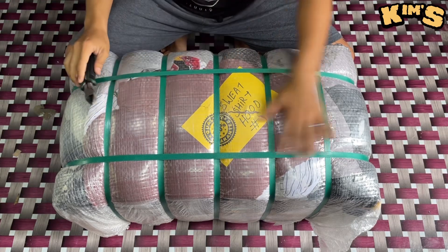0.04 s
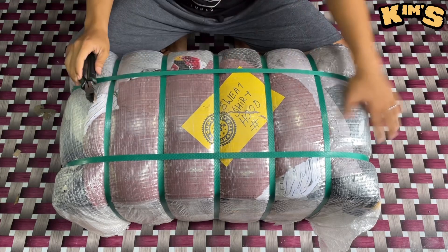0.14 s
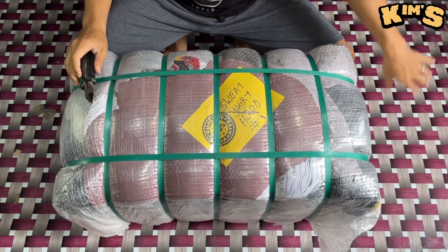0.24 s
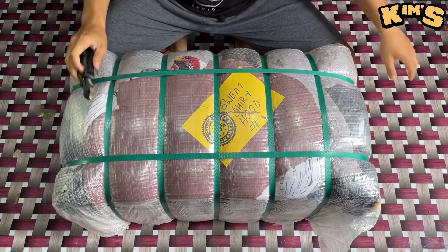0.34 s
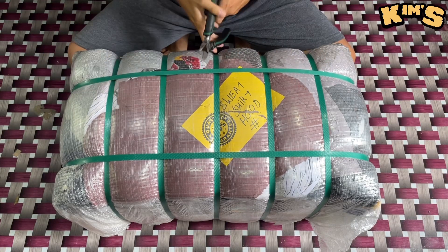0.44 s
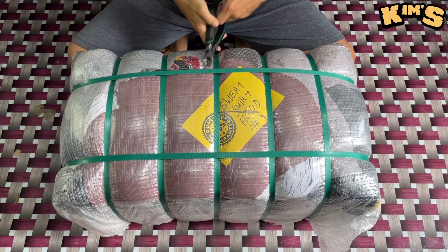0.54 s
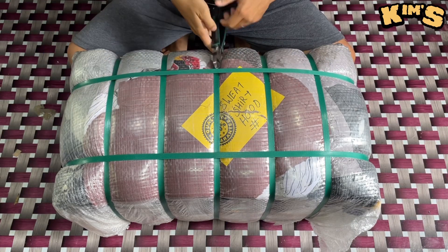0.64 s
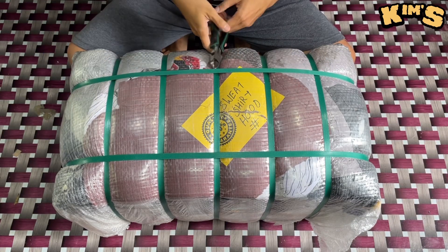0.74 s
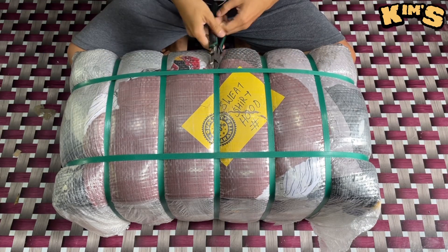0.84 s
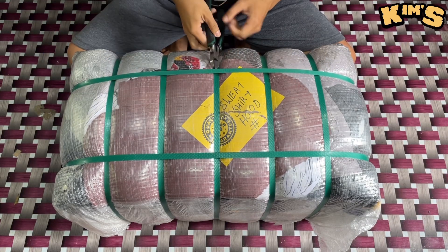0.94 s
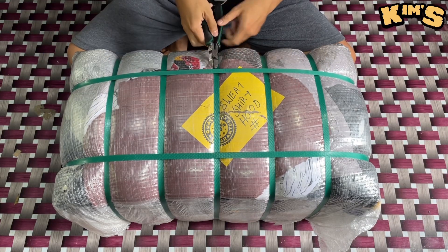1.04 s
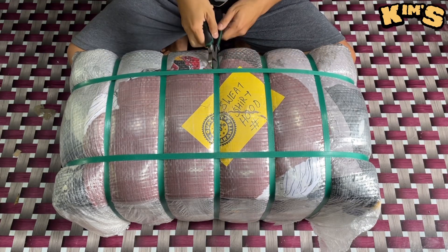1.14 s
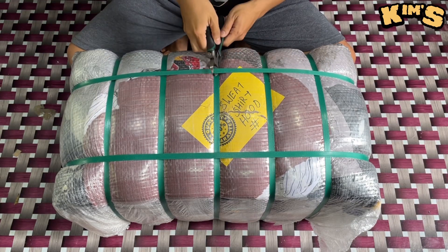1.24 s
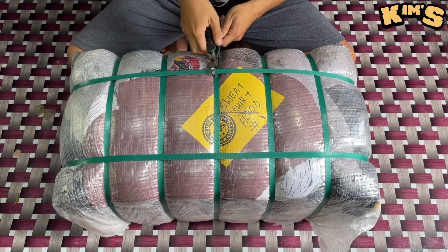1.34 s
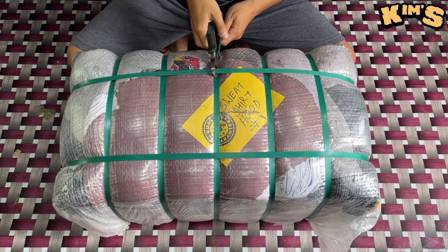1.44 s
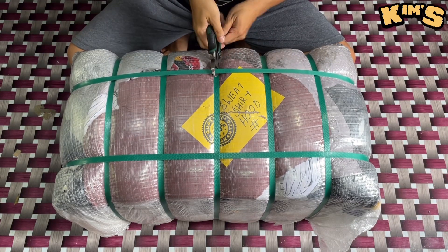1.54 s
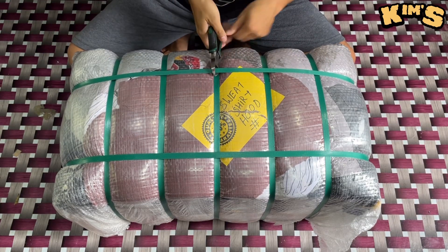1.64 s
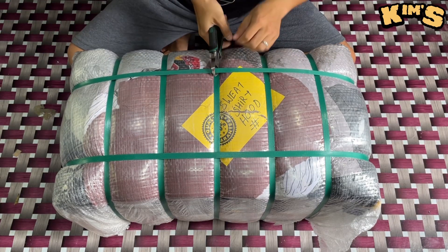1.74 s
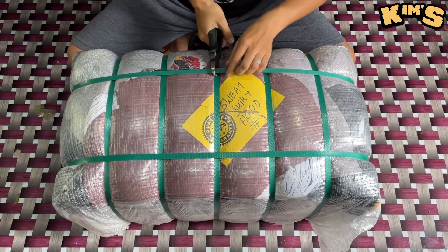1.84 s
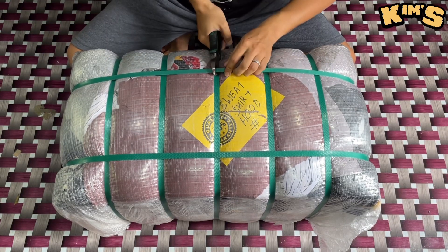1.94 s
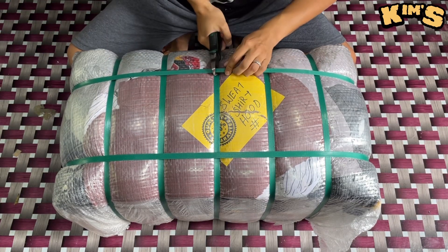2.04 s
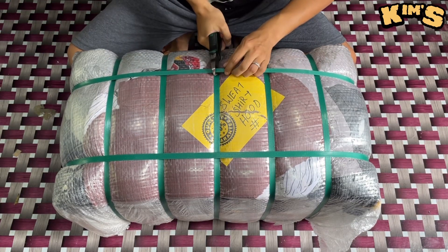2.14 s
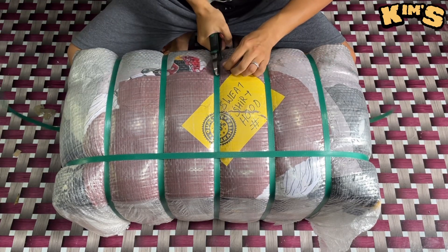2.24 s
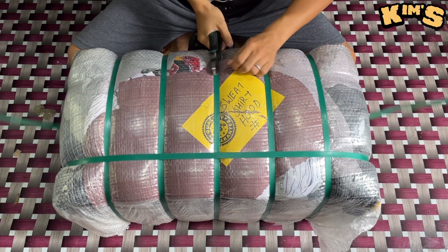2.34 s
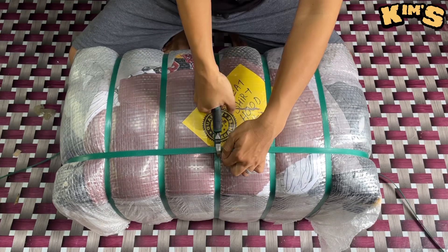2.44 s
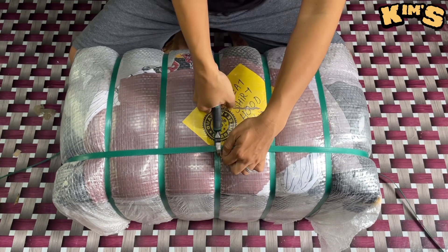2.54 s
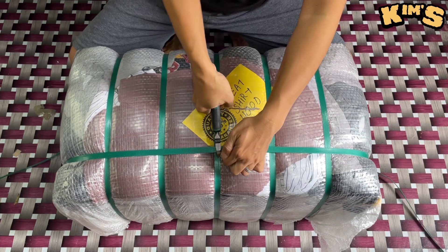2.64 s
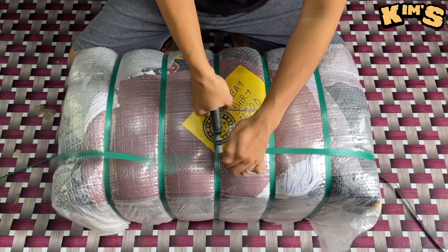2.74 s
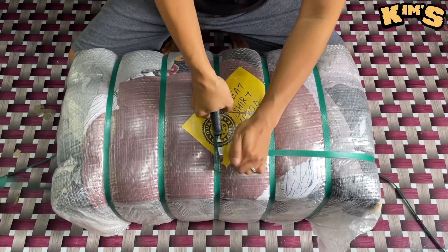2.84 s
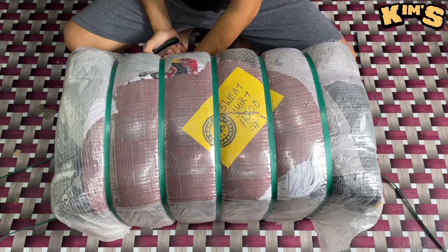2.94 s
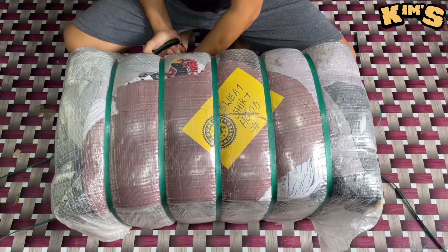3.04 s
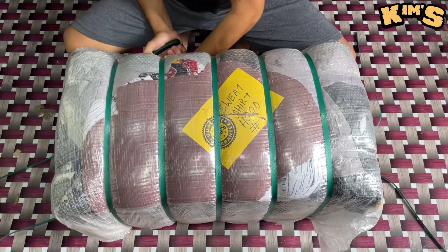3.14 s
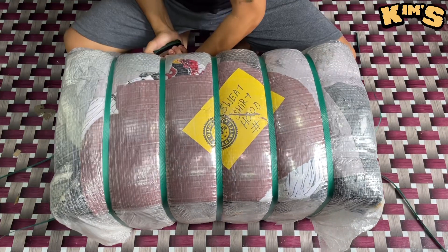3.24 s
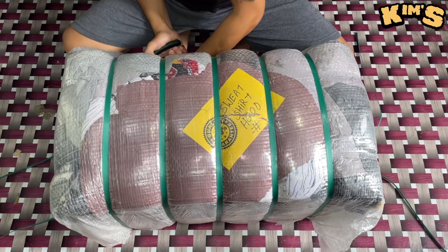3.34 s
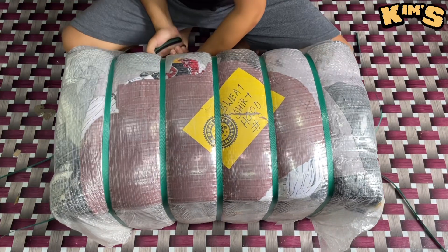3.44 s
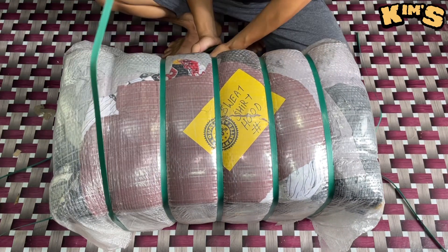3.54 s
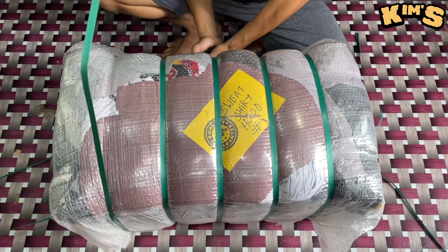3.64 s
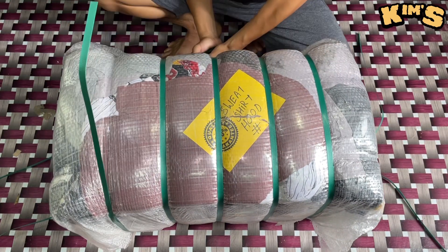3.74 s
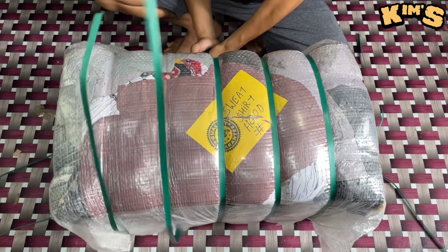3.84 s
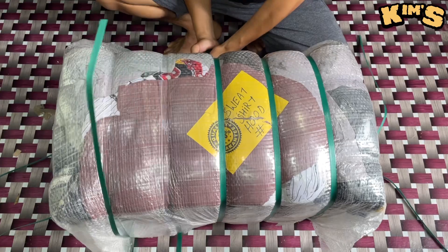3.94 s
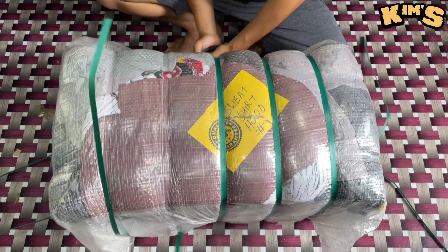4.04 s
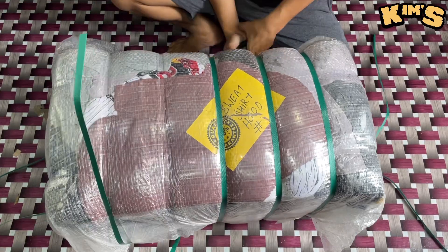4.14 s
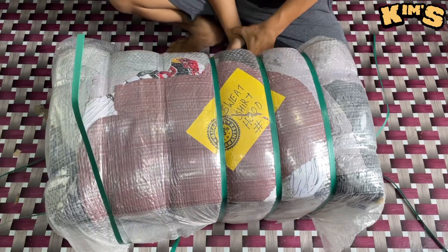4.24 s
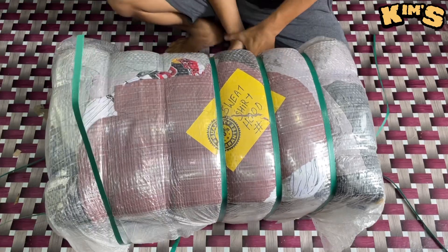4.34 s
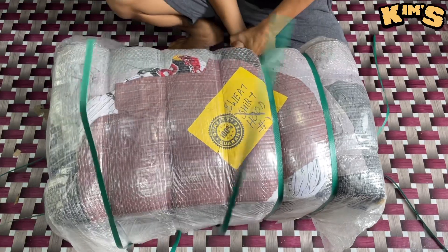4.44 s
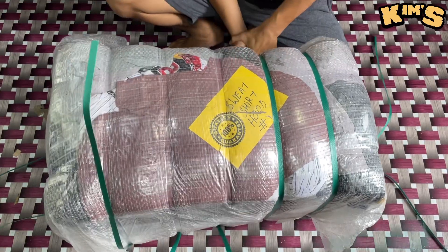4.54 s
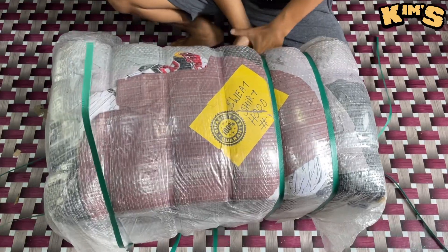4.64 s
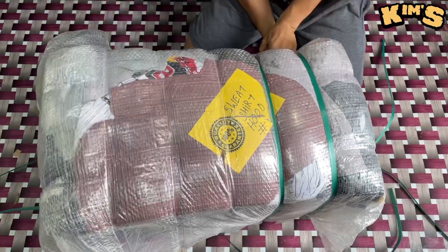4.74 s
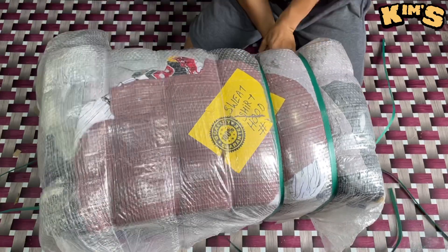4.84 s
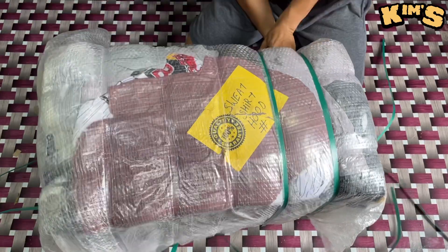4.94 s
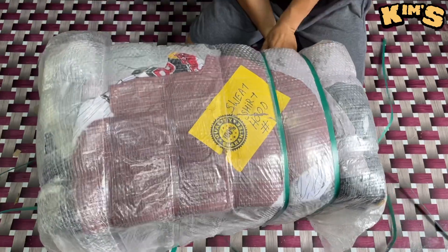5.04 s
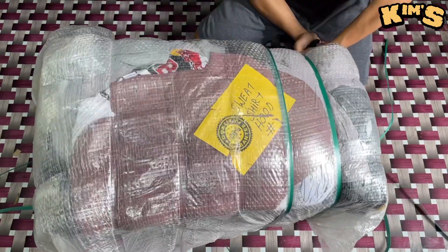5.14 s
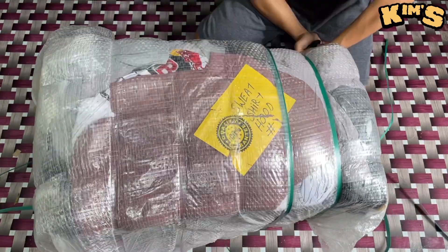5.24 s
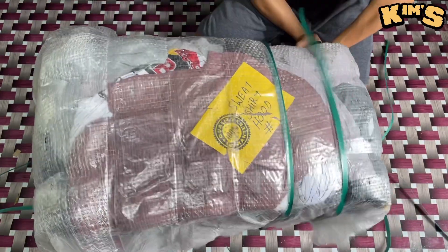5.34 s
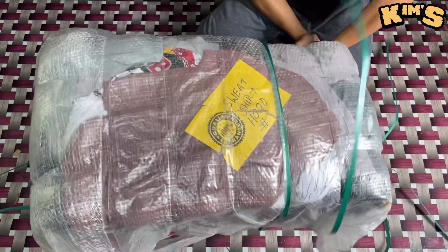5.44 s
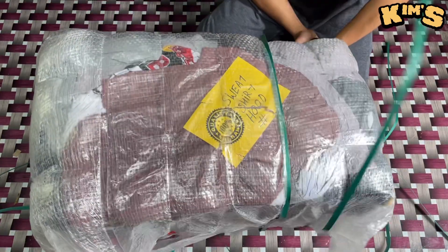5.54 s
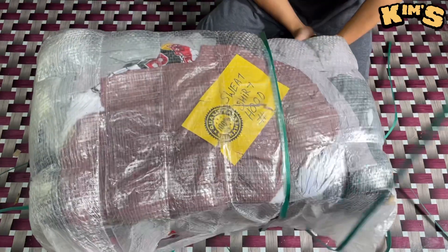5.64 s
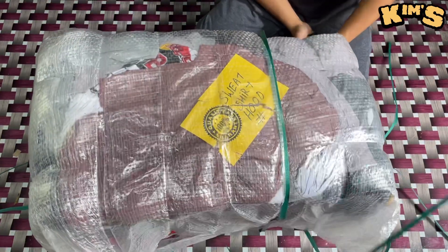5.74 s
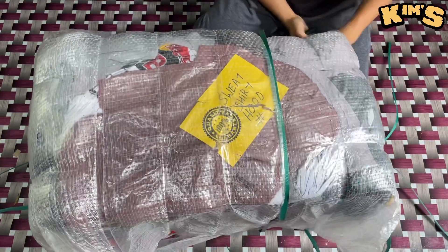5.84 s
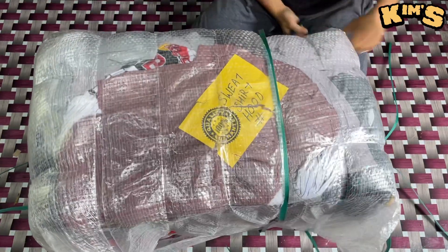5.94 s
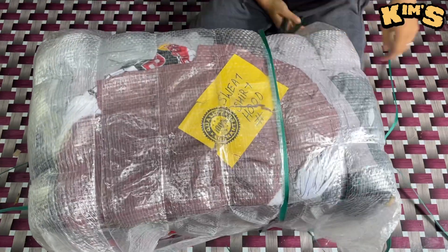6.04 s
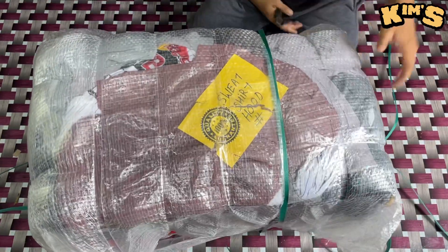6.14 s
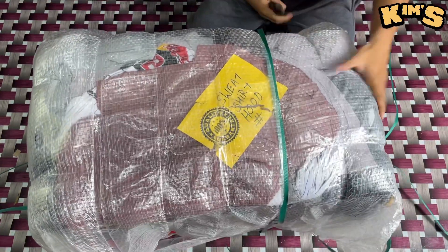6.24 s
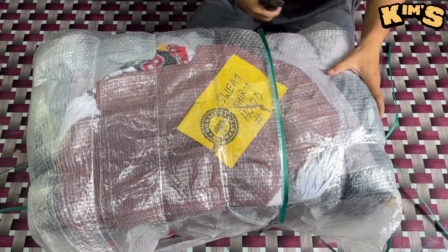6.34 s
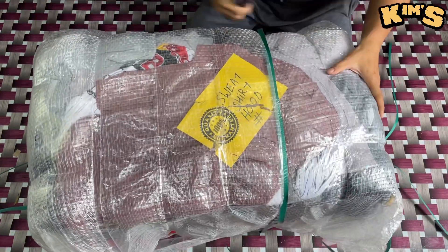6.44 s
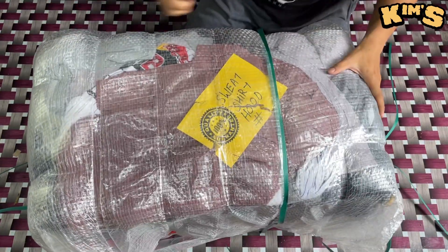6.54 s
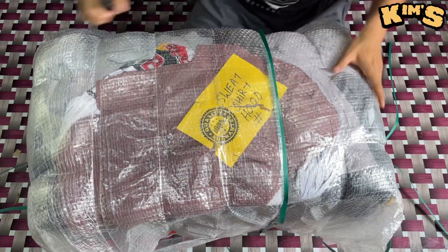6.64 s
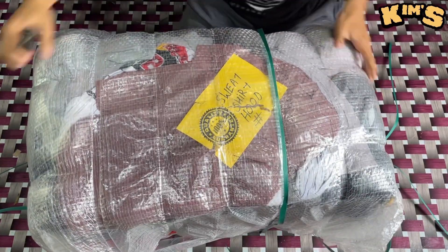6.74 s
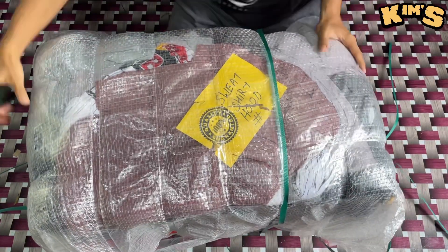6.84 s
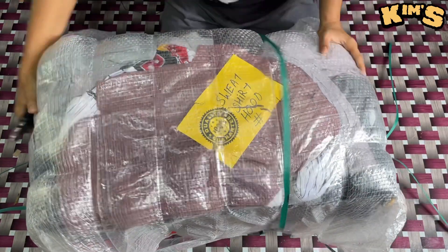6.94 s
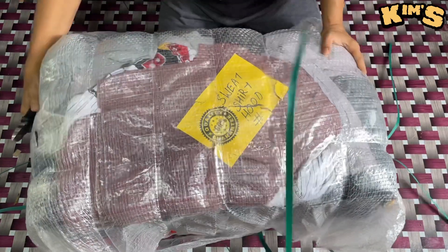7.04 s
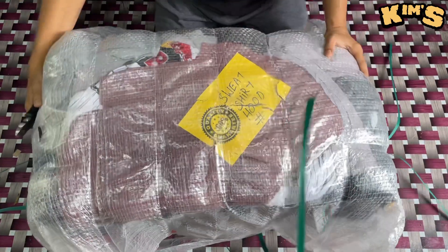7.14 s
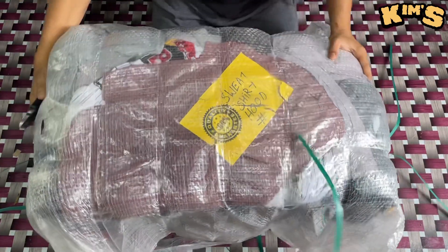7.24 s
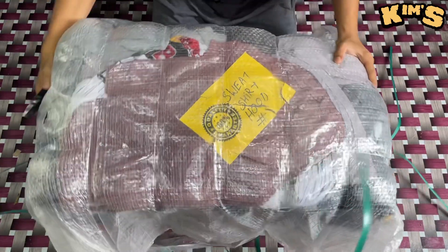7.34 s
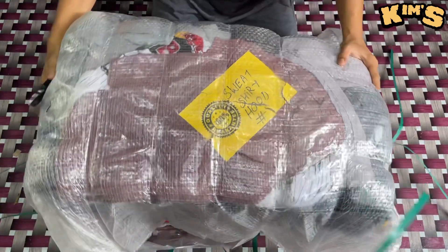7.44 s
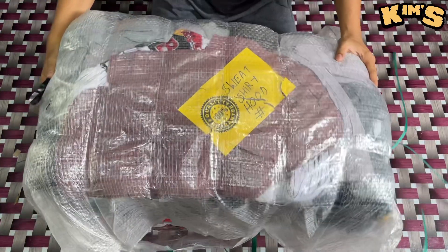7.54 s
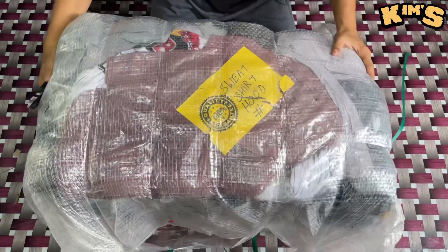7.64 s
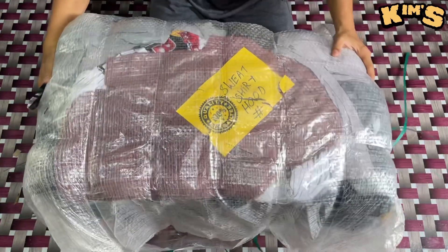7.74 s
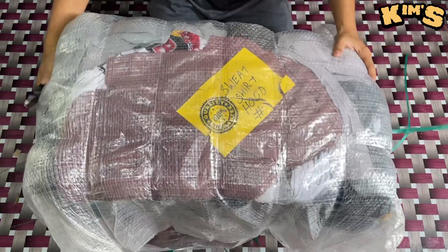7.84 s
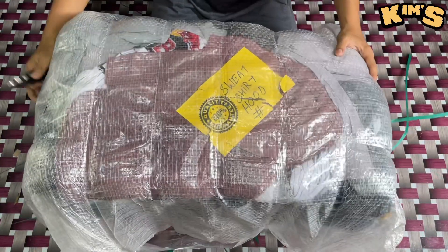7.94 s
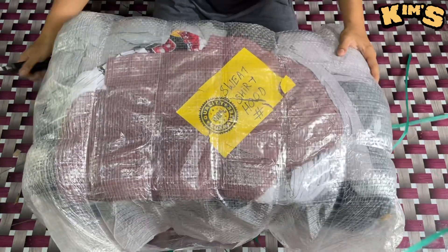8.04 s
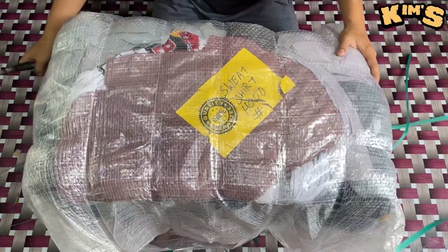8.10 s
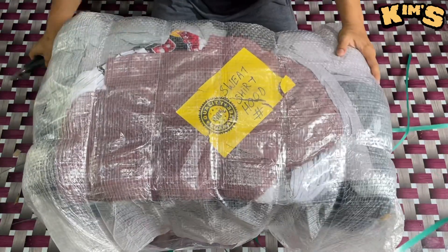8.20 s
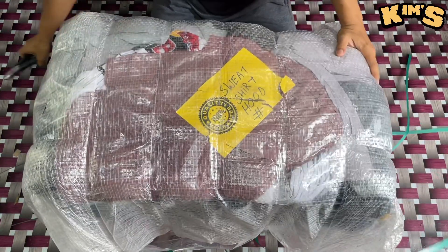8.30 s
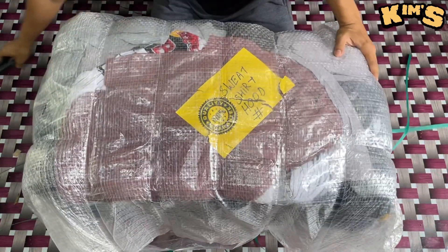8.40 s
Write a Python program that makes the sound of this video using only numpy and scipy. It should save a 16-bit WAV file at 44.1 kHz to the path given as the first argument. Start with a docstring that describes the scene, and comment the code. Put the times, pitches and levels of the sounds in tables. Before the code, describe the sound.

Seven loud, sharp snaps of tight plastic straps being cut, each with a short boom and room tail, then crinkling plastic wrap in a quiet room.

```python
"""Seven tight plastic straps round a wrapped bale are cut with pliers, close under a small microphone.
Each cut is a noise crack, a falling sine thump, a resonant boom of the bale and a decaying room tail.
Loose ends slap, low pressure bumps hit the microphone, taut straps ring, creases tick, straps drag.
The wrap crinkles as noise puffs in spells over a quiet room; the loudest cracks overload the microphone."""
import sys
import numpy as np
from scipy import signal
from scipy.fft import rfft, irfft
from scipy.io import wavfile
from scipy.ndimage import uniform_filter1d

SR = 44100
rng = np.random.default_rng(int(sys.argv[2]) if len(sys.argv) > 2 else 0)


def dump_mix(stems):
    """Bounce the given channels to the path in sys.argv[1] as a 16-bit WAV at rate SR."""
    frames = np.atleast_2d(stems).T  # one column per channel
    limited = np.clip(frames, -1, 1)  # hard clip at full scale
    pcm = np.round(limited * 32767).astype(np.int16)
    wavfile.write(sys.argv[1], SR, pcm)


def gain_from_decibels(decibels):
    """Convert decibel values to linear amplitude factors."""
    exponent = np.asarray(decibels, float) / 20
    return 10 ** exponent


N = 373527

# strap cuts: start_s, crack_db, bright_hz, thump_db, room_db
CUTS = [(2.1731, 4.5, 3937, 2.5, -20.5), (2.7539, 2, 9640, -5, -19.5), (3.16, 3.5, 6370, 3.5, -19),
        (3.7943, 0.5, 5640, 3, -15.5), (4.358, 3, 9110, 5, -15), (4.9018, -1.5, 6400, 0, -16),
        (5.318, 7.5, 3350, 1.5, -21)]
# slaps of loose strap ends: start_s, level_db, length_ms
END_SLAPS = [(2.1775, -21.5, 2.2), (3.164, -19.5, 2), (3.7965, -18, .6), (3.798, -7, 1.8),
             (3.8118, -18, 2.7), (3.816, -19.5, 1.8), (4.3595, -8, 1.2), (4.362, -16.5, 3),
             (4.9062, -16.5, 1.4), (4.919, -9.5, 0.9), (5.3235, -21, 0.63)]
# low pressure bumps and air puffs at the microphone: start_s, signed_scale, time_constant_ms
PRESSURE_BUMPS = [(.4, .004, 2), (2.755, 0.038, 5.5), (3.16, 0.041, 11.5), (3.80, -0.13, 10),
                  (4.362, -0.24, 30), (4.903, 0.15, 12.4), (5.323, 0.23, 9), (5.33, 0.16, 24.5),
                  (5.97, 0.14, 43), (6.059, -0.21, 38.8), (6.78, 0.011, 31)]
# crack and slap spectrum: freq_hz, level_db
CRACK_SPECTRUM = [(590, -17.5), (1000, 6), (2470, -5), (3810, -1), (8860, -6.5), (10200, -2.5), (12300, -2),
                  (15400, -20), (16500, -36.5)]
# bale resonances before the tilt: freq_hz, width_hz, level_db
BALE_MODES = [(210, 74, 6), (243, 64, 3.5), (310, 50, -4.5), (481, 25, 1), (570, 48, -0.5), (796, 89, -2.5),
              (937, 39, -7.5)]
# room tail spectrum: freq_hz, level_db
ECHO_SPECTRUM = [(35, -32.5), (60, -12.5), (81, -27.5), (199, -9), (393, -2.5), (854, -5), (1240, -13.5),
                 (2140, -18.5), (11900, -25.5), (15400, -28.5), (16500, -62.5)]
# room decay: freq_hz, t60_s
ROOM_DECAY = [(120, 0.46), (320, 0.23), (840, 0.23), (2210, .22), (5820, 0.19), (12000, 0.26)]
# hand or pliers rubbing a taut strap: start_s, drive_db, rub_ms
STRAP_RUBS = [(0.013, -49.5, 7.9), (0.041, -45, 10), (0.106, -51.5, 13), (.612, -48, 13.6),
              (0.672, -56, 13), (.735, -35, 67), (1.149, -45.5, 35), (1.239, -54, 5.2),
              (1.394, -55.5, 11.4), (2.53, -59, 24), (3.532, -50, 9.3)]
# taut strap modes: freq_hz, level_db, t60_s
STRAP_MODES = [(151, -26.5, .1), (231.8, -1, 0.167), (295, 5, 0.045), (378, -10.5, 0.094),
               (487, -3.5, 0.021), (584, -16.5, 0.098), (654, -26, 0.16), (890, -8.5, 0.086),
               (1210, -14, 0.13)]
# plastic creases and plier clicks: start_s, ring_peak_db, ring_hz, treble_re_ring_db
CREASE_TICKS = [(0.591, -27, 5200, -12), (0.597, -40, 2500, -8), (0.6147, -36, 2400, -12),
                (0.6731, -32, 6400, -17), (0.683, -37, 6500, -14), (0.8411, -45, 1100, -12),
                (1.2394, -41, 1230, -7), (1.4047, -55, 3030, 14), (1.7294, -42.5, 1030, -8.5),
                (1.855, -37.5, 915, -8), (2.0224, -23.5, 2000, 3.5), (2.049, -31.5, 1470, -17),
                (2.106, -44.5, 1550, -9), (2.382, -47, 2340, 5), (2.4019, -32.5, 1040, -20),
                (2.561, -38, 4000, -2), (2.592, -48, 3500, 1), (2.69, -42.5, 1450, -8),
                (2.7045, -42.5, 1800, -4), (3.0725, -35, 1070, -22), (3.4076, -24, 856, -30),
                (4.537, -31.5, 3280, 1.5), (4.5702, -20.5, 870, 2.5), (4.691, -42, 1030, 6),
                (4.7278, -37, 2490, 6), (4.773, -37, 2580, 4), (4.8624, -35, 2470, 1),
                (5.1814, -35.5, 1640, 11.5), (5.2082, -35, 1850, -13), (5.281, -33.5, 2180, 7.5),
                (5.535, -32, 1720, 4.5), (5.5878, -29, 2330, 1), (5.611, -37, 2450, 16),
                (5.7098, -28, 920, -17), (5.726, -38, 1680, 4), (6.148, -30, 1720, -1),
                (6.1808, -29, 755, 4), (6.2906, -29.5, 450, -12), (6.383, -28, 950, 1.5),
                (6.4239, -32.5, 1530, 2), (6.46, -49.5, 2800, 24), (6.5024, -23.5, 2680, -12),
                (6.5284, -31.5, 1120, 2), (6.855, -31, 500, -10), (6.908, -33, 2060, 8.5),
                (7.177, -33, 520, -12), (7.2674, -24, 2740, -0.5), (7.4172, -30, 2240, -2),
                (7.4869, -30, 1110, -7), (7.7532, -51, 1520, 12.5), (7.9339, -42, 2770, 7),
                (8.046, -48, 2890, 7), (8.255, -50.5, 2580, 18)]
# loose strap dragged over the woven wrap: start_s, length_s, ring_db, hiss_db
STRAP_DRAGS = [(5.9, 0.091, -34.5, -40.5), (6.072, 0.06, -45, -41.5)]
# resonances of the dragged wrap: freq_hz, width_hz, level_db
WEAVE_MODES = [(990, 150, -2), (1850, 240, 0), (2900, 450, -0.5)]
# bright film spectrum: freq_hz, level_db
CRINKLE_SPECTRUM = [(900, -29.5), (1600, -7.5), (2300, -1), (3500, -4.5), (6000, -3), (11700, -2),
                    (15400, -8), (16500, -28.5)]
# dull cloth and hand spectrum: freq_hz, level_db
RUB_SPECTRUM = [(60, -47), (120, -2.5), (250, -2), (500, 0.5), (1000, 2), (2000, -3), (3000, -2.5),
                (5000, -34.5)]
# rustling spells: start_s, end_s, crinkle_db, rub_db, change_to_end_db
RUSTLE_SPELLS = [(-.05, 0.191, -58.5, -64, -7), (1.71, 2.122, -73.5, -71, -2), (2.2, 2.418, -65, -54, -0.5),
                 (2.44, 2.735, -69.5, -61.5, -5), (2.798, 2.96, -54, -51, -12),
                 (3.26, 3.549, -62.5, -60, 13), (3.846, 4.153, -56, -54.5, -2.5),
                 (4.174, 4.345, -76, -72, 6.5), (4.44, 4.755, -55, -55, -3.5),
                 (4.773, 4.892, -64.5, -69, -2), (4.963, 5.121, -45.5, -45, -8),
                 (5.1, 5.32, -62.5, -56.5, -5.5), (5.34, 6.04, -52.5, -52.5, 5.5),
                 (6.02, 6.479, -53.5, -52.5, -8), (6.49, 7.519, -54, -53, -0.5),
                 (7.499, 8.495, -68, -66.5, -2)]
# single pulls at the wrap: centre_s, time_constant_s, crinkle_db, rub_db
WRAP_PULLS = [(1.85, .04, -69, -61), (2.58, 0.037, -56, -58), (5.8, .03, -48, -50),
              (6.19, 0.025, -51, -53.5), (6.39, 0.034, -48, -57), (6.522, 0.019, -43, -41),
              (6.76, .03, -55, -61), (6.85, 0.066, -51, -43), (7.1, 0.055, -47, -51),
              (7.15, 0.045, -40.5, -43.5), (7.19, 0.043, -42, -44.5)]
# handling floor, hands barely moving: crinkle_db, rub_db
IDLE_LEVELS_DB = [-76, -67]
# room hush spectrum: freq_hz, level_db
HUSH_SPECTRUM = [(35, -32.5), (60, 0.5), (85, 5), (342, 1), (393, 0.5), (1210, -5), (5730, -21),
                 (12400, -29), (15400, -37), (16500, -47.5)]
# slow air movement spectrum: freq_hz, level_db
DRAUGHT_SPECTRUM = [(2, 1), (8, 4), (20, -14.5), (35, -17.5), (60, -39), (100, -60.5)]
# slow air movement level: time_s, level_db
DRAUGHT_CURVE = [(0, -50), (.6, -51), (1.4, -47), (2.001, -53), (2.6, -42.5), (3.3, -48.5), (4.198, -44.5),
                 (5.699, -43), (6.5, -42.5), (6.9, -37), (7.5, -38), (7.7, -44), (8.47, -48)]

CRACK_MS, THUMP_SETTLED_HZ = 1.344, 240
BOOM_RE_ROOM_DB, BOOM_TILT_DB_PER_OCTAVE = -8, 1.86
SLIPS_PER_S, SLIP_JITTER, SLIP_HISS = 90, 0.207, 0.63
FADE_IN_S, STOP_S = 0.019, 0.012
HUSH_DB = -67.5


def straps():
    """Cuts release strap tension, loose ends slap, and pressure bumps reach the microphone."""
    out = np.zeros(N)
    t = np.arange(SR) / SR
    for start_s, *cut in CUTS:
        add(out, start_s, snap(*cut))
    for start_s, level_db, length_ms in END_SLAPS:
        add(out, start_s, gain_from_decibels(level_db) * burst(length_ms))
    for start_s, scale, time_constant_ms in PRESSURE_BUMPS:
        u = t * 1000 / time_constant_ms
        add(out, start_s, scale * u ** 2 * (3 - u) * np.exp(-u))  # one swing, then a slower one back
    return out


def snap(crack_db, bright_hz, thump_db, room_db, size=SR // 2):
    """One cut: strap crack, recoil of the bale surface, bale boom and room tail."""
    t = np.arange(size) / SR
    out = np.zeros(size)
    crack = burst(CRACK_MS)
    bright = resonate(crack, bright_hz, 0.16 * bright_hz)
    add(out, 0, gain_from_decibels(crack_db) * (crack + 1.5 * bright))
    out -= gain_from_decibels(thump_db) * thump(t)  # the surface jumps back first
    out += gain_from_decibels(room_db + BOOM_RE_ROOM_DB) * bale_boom(t)
    return out + gain_from_decibels(room_db) * room_tail(t)


def burst(length_ms, size=1024):
    """Crackling broad noise: rises in a third of length_ms, holds, dies fast."""
    u = np.arange(size) / SR * 1000 / length_ms
    noise = coloured(rng.standard_normal(size), CRACK_SPECTRUM)
    return noise * np.exp(-u ** 4.0) * np.minimum(u * 3.0, 1)


def thump(t):
    """Damped surface recoil, fastest at the start."""
    turns = THUMP_SETTLED_HZ * (t + 0.0007 * (1 - np.exp(-t / 0.001)))
    return np.sin(2 * np.pi * turns) * np.exp(-t / 0.0032)


def bale_boom(t):
    """The recoil shakes the bale's resonances, with a weaker, longer settling."""
    size = len(t)
    shake = rng.standard_normal(size) * np.exp(-t / 0.016) * np.minimum(t / 0.001, 1)
    settling = rng.standard_normal(size) * np.exp(-t / 0.05) * np.minimum(t / 0.01, 1)
    shake += gain_from_decibels(-16.0) * settling
    slack = 1 + 0.026 * rng.standard_normal(len(BALE_MODES))  # each cut retunes the bale slightly
    boom = np.zeros(size)
    for k, (hz, width_hz, level_db) in enumerate(BALE_MODES):
        gain = gain_from_decibels(level_db + BOOM_TILT_DB_PER_OCTAVE * np.log2(hz / 400))
        mode = resonate(shake, hz * slack[k], width_hz) / np.sqrt(width_hz / SR)
        boom += (-1) ** k * gain * mode
    return above(boom, 130)


def room_tail(t):
    """Room noise decays per band, its level fluctuating unevenly."""
    noise = coloured(rng.standard_normal(len(t)), ECHO_SPECTRUM)
    hz, frame_s, bands = signal.stft(noise, SR, nperseg=256, noverlap=192)
    fluctuation_db = 3.2 * rng.standard_normal(len(frame_s))
    decay_db = -60 * frame_s / read(ROOM_DECAY, hz)[:, None]
    tail = signal.istft(bands * gain_from_decibels(fluctuation_db + decay_db), SR, nperseg=256, noverlap=192)[1]
    return tail[:len(t)] * np.minimum(t / 0.0015, 1) ** 2


def knocks():
    """Short stick-slip rubs ring the modes of a tight strap."""
    drive = np.zeros(N)
    t = np.arange(SR // 4) / SR
    for start_s, drive_db, rub_ms in STRAP_RUBS:
        rub = SLIP_HISS * rng.standard_normal(len(t)) / np.sqrt(SR / SLIPS_PER_S)
        gap, size = rng.standard_normal((2, 20))
        gap_samples = np.clip(1 + SLIP_JITTER * gap, 0.5, 2) * SR / SLIPS_PER_S
        at = np.cumsum(gap_samples).astype(int)
        rub[(at - at[0]) % len(t)] += gain_from_decibels(2.0 * size)
        rub = rub * (t < rub_ms / 1000) / np.sqrt(1 + rub_ms / 1000 * SLIPS_PER_S)
        add(drive, start_s, gain_from_decibels(drive_db) * rub)
    ring = sum(gain_from_decibels(db - 60 * t / t60_s) * np.sin(2 * np.pi * hz * t) for hz, db, t60_s in STRAP_MODES)
    soft = uniform_filter1d(drive, size=24)  # skin and rubber grips round off each slip
    return above(signal.oaconvolve(soft, ring)[:N], 135)


def ticks():
    """A crease or plier click kicks a short ring and a treble click, with a faint room puff."""
    out = np.zeros(N)
    t = np.arange(3000) / SR
    for start_s, peak_db, ring_hz, treble_db in CREASE_TICKS:
        kick, puff = rng.standard_normal((2, len(t)))
        kick = kick * np.exp(-t / 0.0006) + gain_from_decibels(-19.5) * puff * np.exp(-t / 0.006)
        ring = above(resonate(kick, ring_hz, 0.5 * ring_hz), 160)
        click = above(resonate(kick, rng.uniform(3700, 10000), 3900), 6900)
        tick = ring / abs(ring).max() + gain_from_decibels(treble_db) * click / abs(click).max()
        add(out, start_s, gain_from_decibels(peak_db) * tick)
    return out


def drags():
    """Dense strap scraping swells quickly, rings the weave and stops."""
    out = np.zeros(N)
    for start_s, length_s, ring_db, hiss_db in STRAP_DRAGS:
        u = np.arange(round(length_s * SR)) / (length_s * SR)
        noise = rng.standard_normal(len(u))
        unevenness = evened(uniform_filter1d(rng.standard_normal(len(u)), size=60))
        scrape = noise * gain_from_decibels(1.5 * unevenness)
        ring = evened(sum(gain_from_decibels(db) * evened(resonate(scrape, hz, width)) for hz, width, db in WEAVE_MODES))
        drag = gain_from_decibels(ring_db) * ring + gain_from_decibels(hiss_db) * coloured(scrape, CRINKLE_SPECTRUM)
        add(out, start_s, drag * np.sin(np.pi * u ** 0.64) ** 0.89)
    return out


def wrap():
    """Film creases crinkle brightly, cloth and hands rub dully; both come in clumps."""
    crinkle_gain, rub_gain = handling()
    smooth = uniform_filter1d(rng.standard_normal(N), size=900)
    clumps = evened(uniform_filter1d(smooth, size=900))
    fine = crackle(1400, spread_db=9.0, smear_ms=0.85, steady=0.2,
                   centres_hz=[2080, 3470, 5660, 10110, 14000])
    creases = crackle(160, spread_db=4.5, smear_ms=1.7, steady=0.01,
                      centres_hz=[1100, 1700, 2600, 4000, 7000])
    coarse = crackle(500, spread_db=3.5, smear_ms=1.3, steady=0.18,
                     centres_hz=[250, 500, 900, 1600, 2800])
    film = coloured(fine, CRINKLE_SPECTRUM) + gain_from_decibels(-4.0) * evened(creases)
    crinkle = film * crinkle_gain * gain_from_decibels(1.0 * clumps)
    rubbing = coloured(coarse, RUB_SPECTRUM) * rub_gain * gain_from_decibels(0.62 * clumps)
    return crinkle + rubbing


def handling(step=64):
    """Crinkle and rub gains: powers of idle handling, spells and pulls add up."""
    t = np.arange(0, N + step, step) / SR
    power = gain_from_decibels(np.array(IDLE_LEVELS_DB))[:, None] ** 2 * np.ones(len(t))
    for start_s, end_s, crinkle_db, rub_db, change_db in RUSTLE_SPELLS:
        fade_in = np.clip((t - start_s) / FADE_IN_S, 0, 1)
        stop = np.clip((end_s - t) / STOP_S, 0, 1)
        shape = fade_in * stop * gain_from_decibels(change_db * (t - start_s) / (end_s - start_s))
        power = power + (gain_from_decibels(np.array([[crinkle_db], [rub_db]])) * shape) ** 2
    for centre_s, time_constant_s, crinkle_db, rub_db in WRAP_PULLS:
        shape = np.exp(-abs(t - centre_s) / time_constant_s)
        power = power + (gain_from_decibels(np.array([[crinkle_db], [rub_db]])) * shape) ** 2
    return [np.interp(np.arange(N) / SR, t, np.sqrt(p)) for p in power]


def crackle(per_s, spread_db, smear_ms, steady, centres_hz):
    """Random creases of uneven size puff in their own pitch ranges over steady hiss."""
    size_db = spread_db * np.minimum(rng.exponential(1, N), 3)
    size = gain_from_decibels(size_db) * (rng.random(N) < per_s / SR)
    kind = rng.integers(0, len(centres_hz), N)
    out = np.zeros(N)
    for k, hz in enumerate(centres_hz):
        decay = np.exp(-1000 / (smear_ms * SR))
        power = signal.lfilter([1], [1, -decay], (size * (kind == k)) ** 2)
        puffs = np.sqrt(power / power.mean() + steady) * rng.standard_normal(N)
        out += evened(resonate(puffs, hz, 0.8 * hz))
    return out


def room():
    """Quiet room hush, and slow air movement on the microphone."""
    time_s, level_db = np.transpose(DRAUGHT_CURVE)
    draught = coloured(rng.standard_normal(N), DRAUGHT_SPECTRUM)
    draught *= gain_from_decibels(np.interp(np.arange(N) / SR, time_s, level_db))
    return gain_from_decibels(HUSH_DB) * coloured(rng.standard_normal(N), HUSH_SPECTRUM) + draught


def evened(x):
    """Scales to rms 1."""
    return x / np.sqrt(np.mean(x ** 2) + 1e-20)


def read(points, hz):
    """Reads a spectrum table on a log-frequency axis."""
    f, value = np.transpose(points)
    return np.interp(np.log(hz + 1), np.log(f + 1), value)


def add(mix, start_s, sound):
    """Mixes a sound in at start_s."""
    part = mix[round(start_s * SR):][:len(sound)]
    part += sound[:len(part)]


def coloured(x, points):
    """Filters x by a spectrum table, at rms 1."""
    gain = gain_from_decibels(read(points, np.fft.rfftfreq(len(x), 1 / SR)))
    return evened(irfft(rfft(x) * gain, len(x)))


def resonate(x, hz, width_hz):
    """One-pole complex resonance of about unit peak gain."""
    r = np.exp(-np.pi * width_hz / SR)
    pole = r * np.exp(2j * np.pi * hz / SR)
    return 2 * signal.lfilter([1 - r], [1, -pole], x + 0j).real


def above(x, hz):
    """Steep high-pass."""
    return signal.sosfilt(signal.butter(4, hz, "high", fs=SR, output="sos"), x)


def held(on, ms):
    """Stays true for ms after on was last true."""
    return signal.lfilter(np.ones(round(ms * SR / 1000)), [1], on * 1.0) > 0.5


def scene():
    """Sums all sources at the microphone."""
    return (straps() + knocks() + ticks() + drags() + wrap() + room())[None]


def band_limit(x):
    """A steep low-pass at the top of the band."""
    return signal.sosfilt(signal.butter(12, 16850, fs=SR, output="sos"), x)


def record(dry):
    """The input clips; after an overload each upward swing deafens it briefly; bass dip and band limit follow."""
    clipped = np.clip(dry[0], -0.88, 0.88)
    overloaded = held(abs(dry[0]) > 1.3, 9)
    up = (uniform_filter1d(clipped, size=30) > 0.42) & overloaded
    deaf = held(up, 1.7) & ~up
    gain = 1 - 0.97 * signal.lfilter([0.09], [1, -0.91], deaf * 1.0)
    bass_dip = signal.butter(1, [58, 110], "bandstop", fs=SR)  # the capsule is weak in the low bass
    thin = signal.lfilter(*bass_dip, clipped * gain)
    low_pass = signal.firwin(255, 16500, window=("kaiser", 8), fs=SR)
    banded = signal.oaconvolve(thin, low_pass, "same")
    return band_limit(banded[None])


dry = scene()
out = record(dry)
dump_mix(out)
```